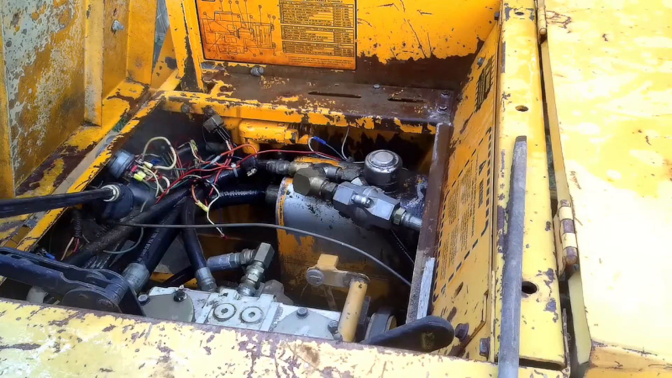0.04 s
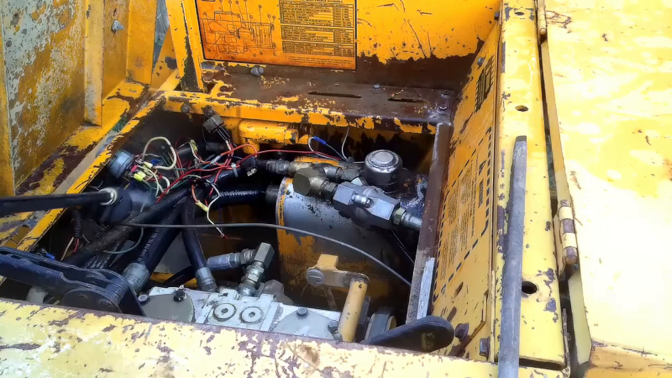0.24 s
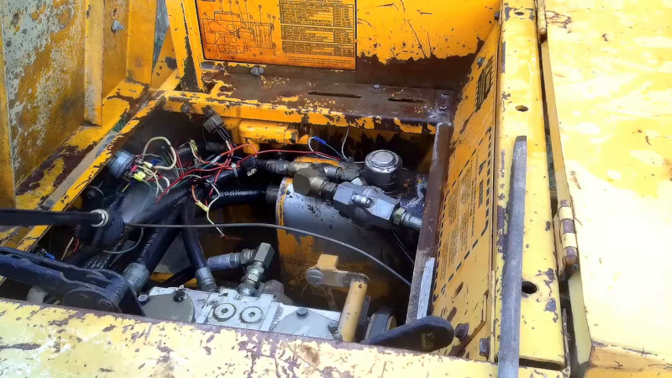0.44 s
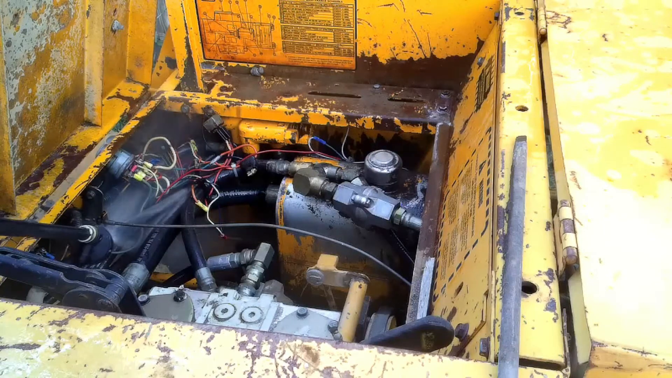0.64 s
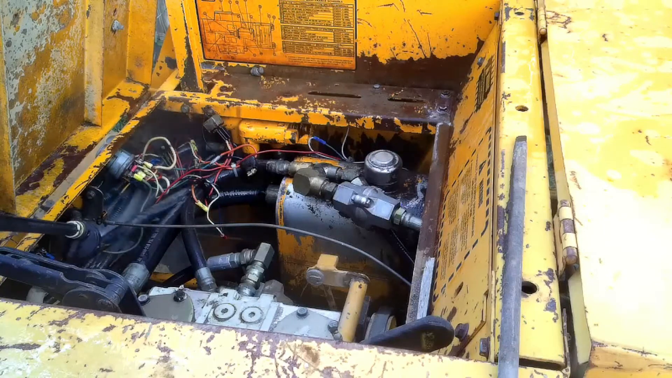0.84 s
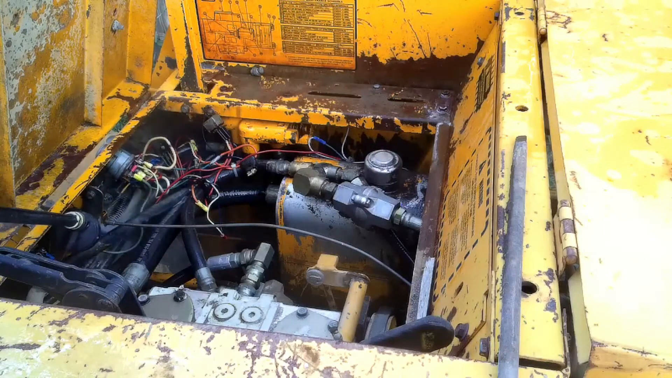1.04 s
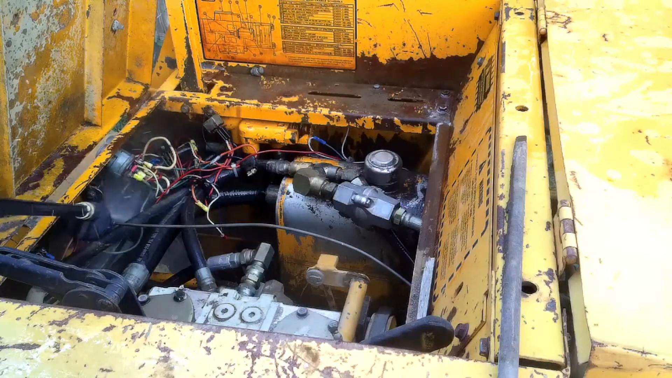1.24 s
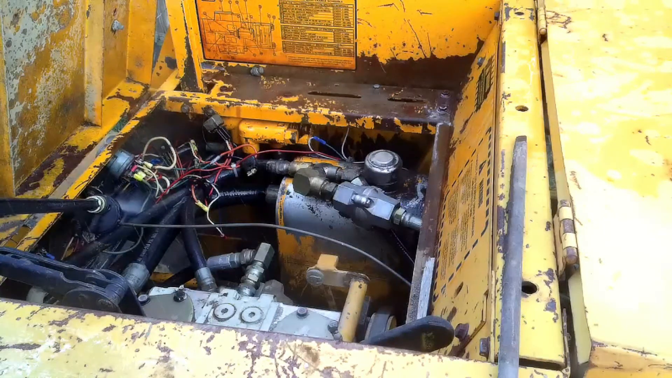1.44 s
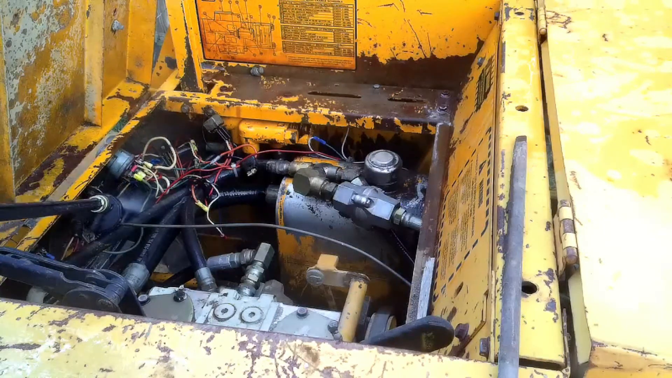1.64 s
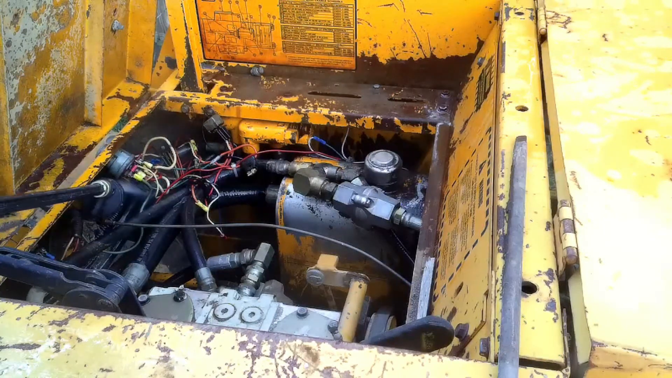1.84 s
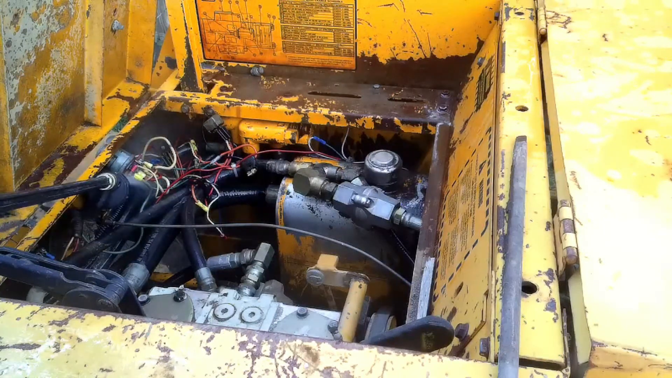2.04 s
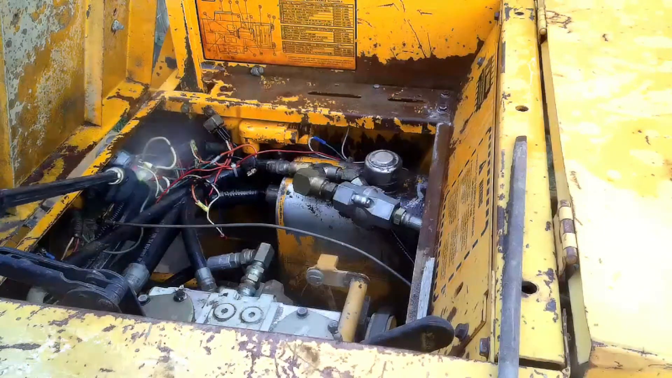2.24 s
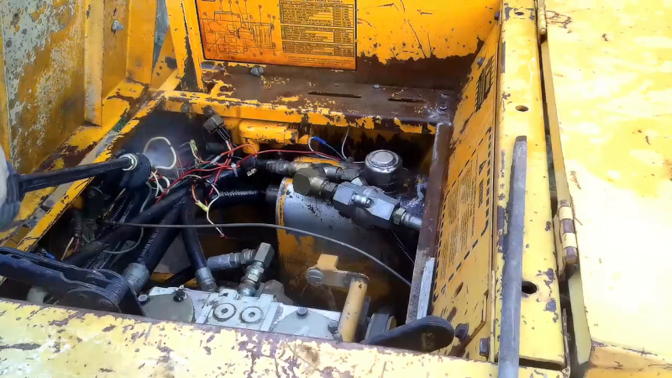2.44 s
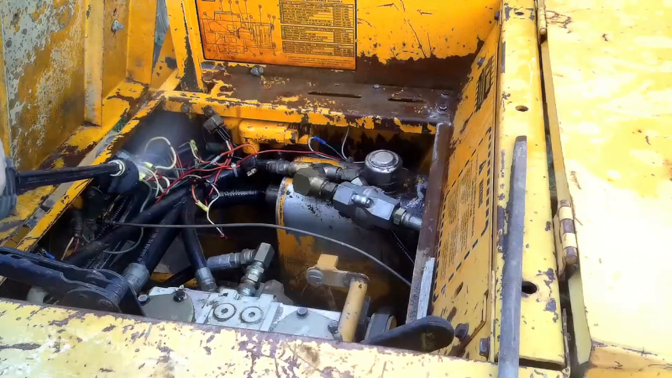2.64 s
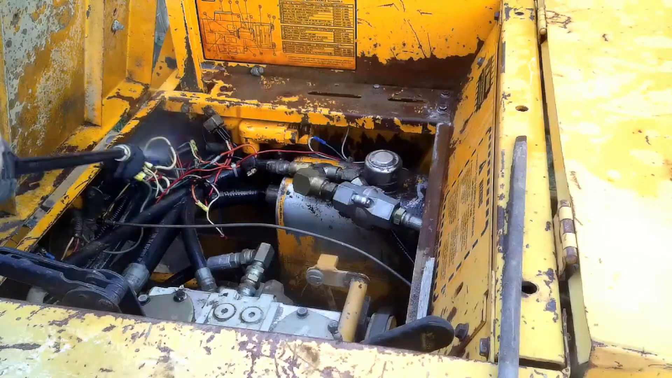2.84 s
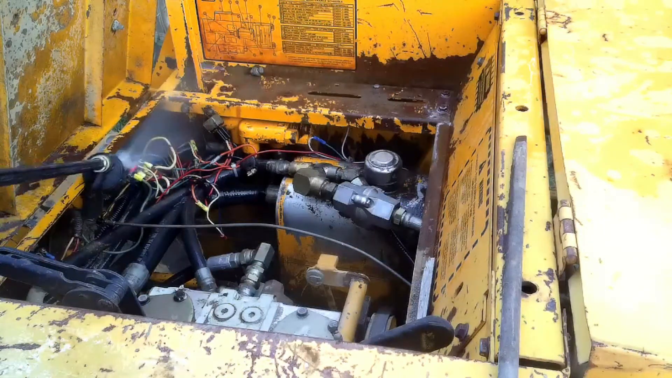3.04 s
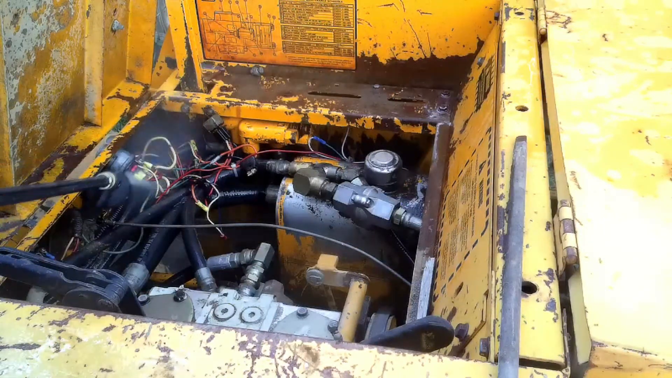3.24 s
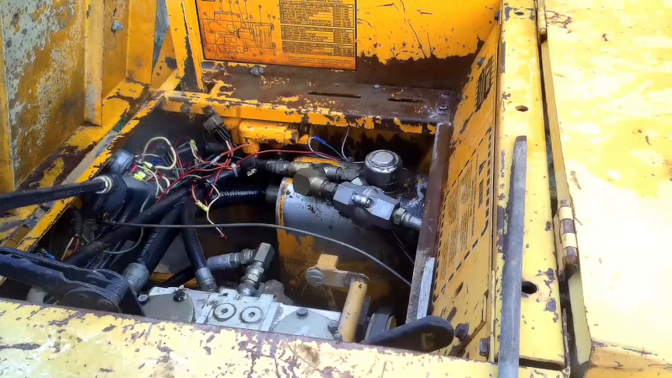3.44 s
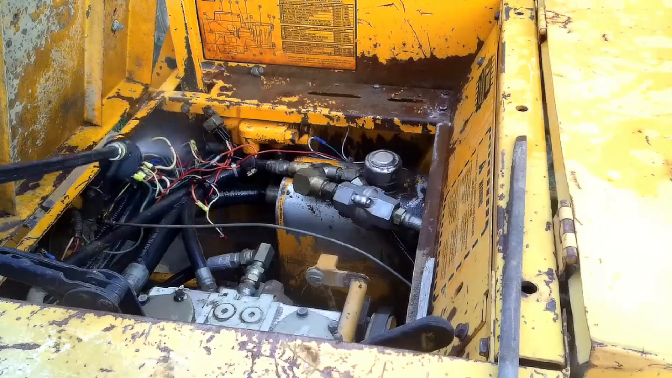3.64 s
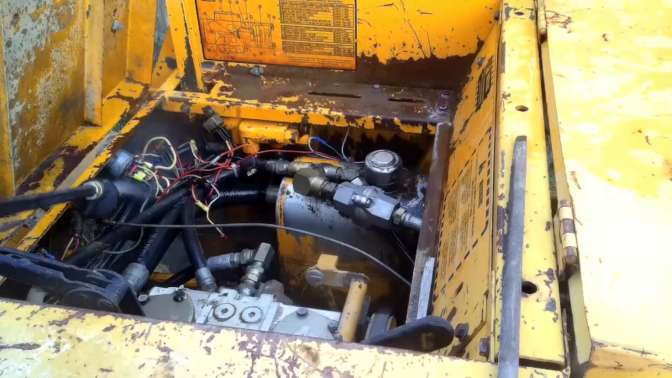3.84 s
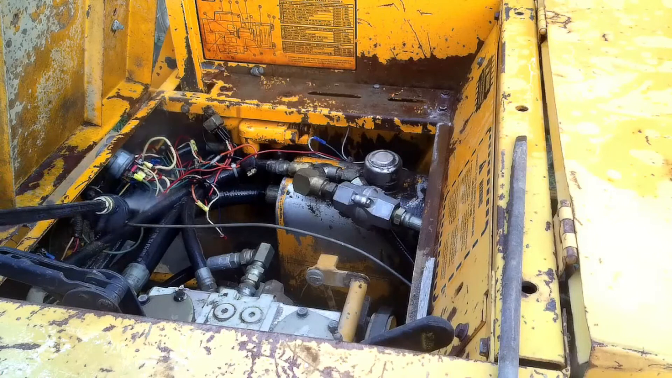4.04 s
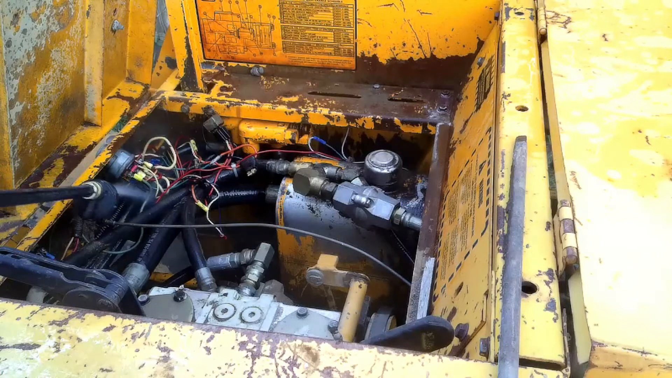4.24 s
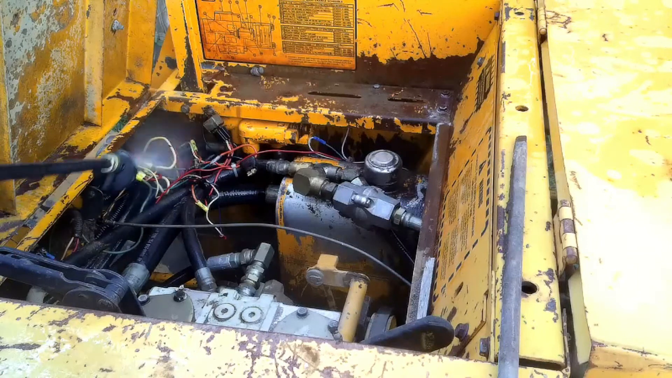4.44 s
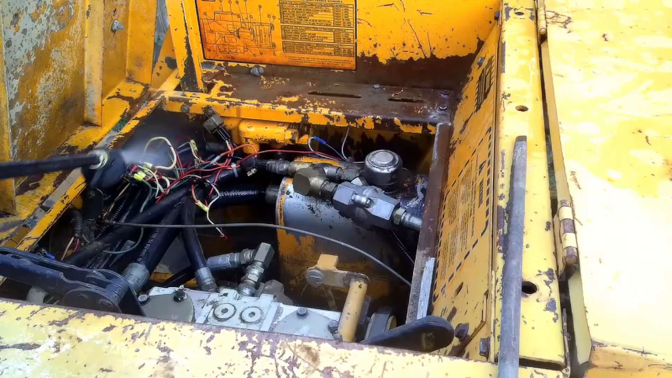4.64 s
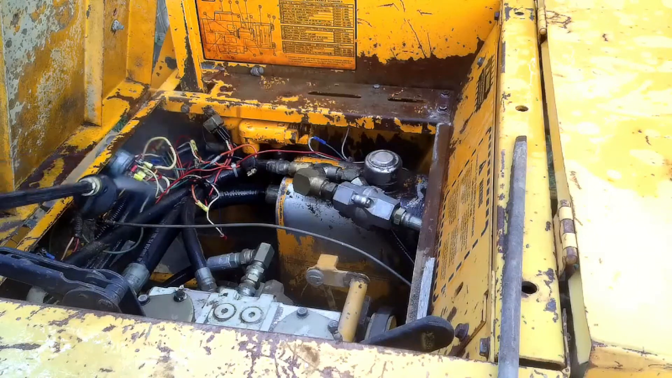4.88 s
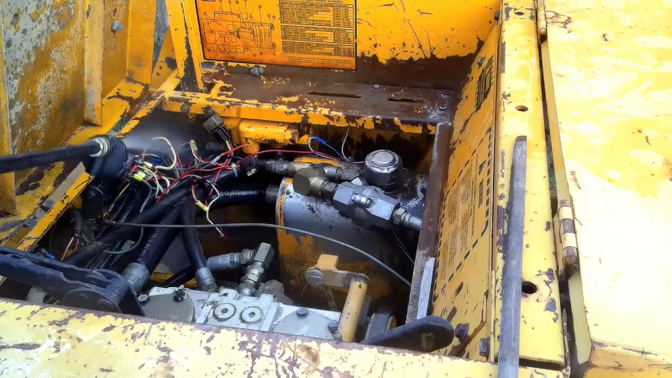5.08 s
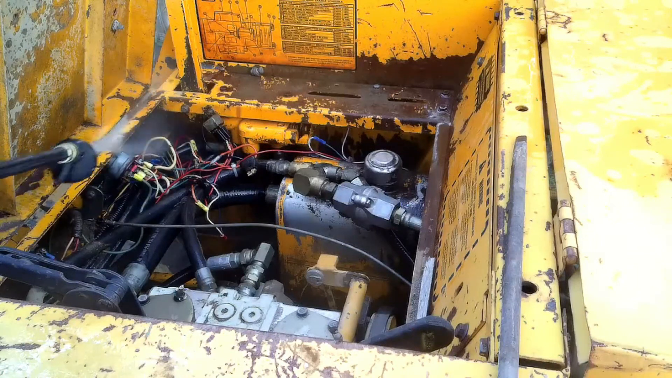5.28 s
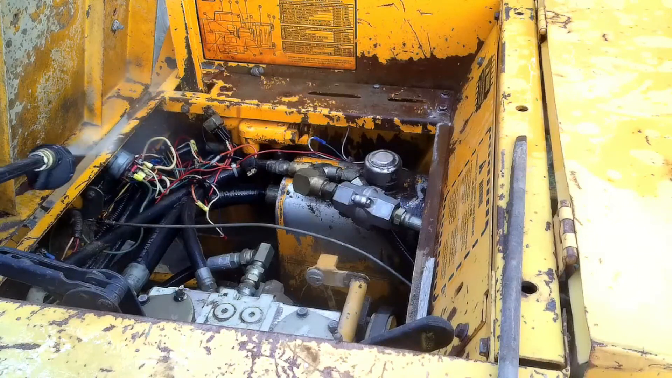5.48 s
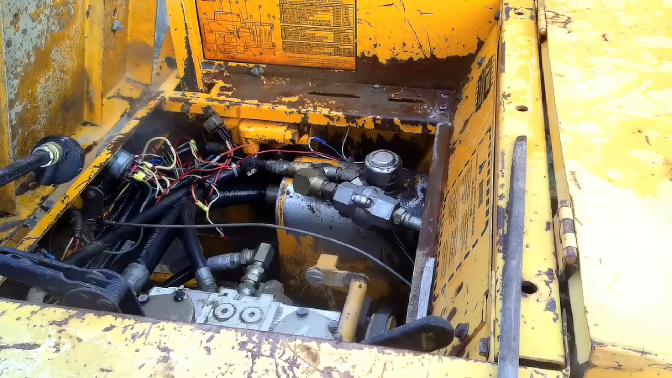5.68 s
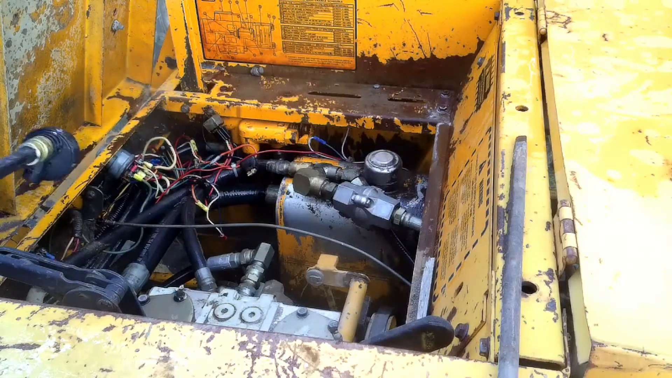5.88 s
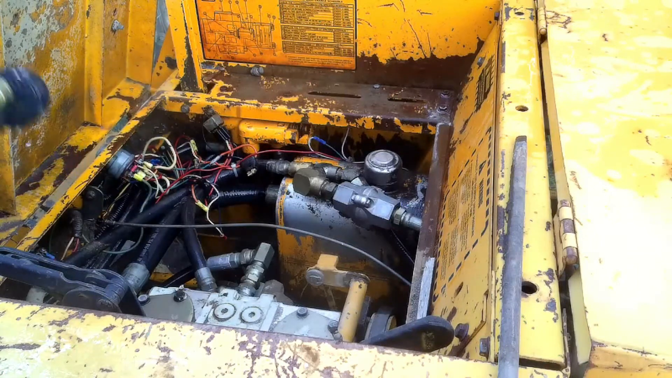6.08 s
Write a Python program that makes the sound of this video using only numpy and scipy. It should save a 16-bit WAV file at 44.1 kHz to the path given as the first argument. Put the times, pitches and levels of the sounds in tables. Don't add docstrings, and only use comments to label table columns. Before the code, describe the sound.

Steady pressurised mist hiss with a shrill electric gear whine, ending in a trigger click, a brief falling buzz, a few ticks and near silence.

```python
import sys
import numpy as np
from scipy import signal
from scipy.fft import rfft, irfft
from scipy.io import wavfile
from scipy.ndimage import uniform_filter1d

SR = 44100
rng = np.random.default_rng(int(sys.argv[2]) if len(sys.argv) > 2 else 0)


def boost(x):
    u = np.asarray(x, float) / 20
    return 10 ** u


def master(y):
    cut = np.clip(np.atleast_2d(y).T, -1, 1)
    pcm = np.round(cut * 32767)
    wavfile.write(sys.argv[1], SR, pcm.astype(np.int16))


N = 269615
TIME = np.arange(N) / SR
BINS_HZ = np.fft.rfftfreq(N, 1 / SR)
EASE_S, OFF_S, STALL_S, STILL_S = 5.55, 5.639, 5.79, 5.84


def curves(table):
    s, *columns = np.transpose(table)
    return [np.interp(TIME, s, column) for column in columns]


def on_spectrum(table, hz):
    at, db = np.transpose(table)
    return np.interp(np.log(hz + 1), np.log(at), db)


def between(tracks, centres_hz, hz):
    place = np.interp(hz, centres_hz, np.arange(len(tracks)))
    k = min(int(place), len(tracks) - 2)
    return tracks[k] + (place - k) * (tracks[k + 1] - tracks[k])


def walk(rate):
    return np.interp(TIME * rate, np.arange(400), rng.standard_normal(400))


def ring(x, hz, width):
    return signal.lfilter(*signal.iirpeak(hz, hz / width, fs=SR), x)


def wave(turns):
    return np.sqrt(2) * np.sin(2 * np.pi * (turns + rng.random()))


# frequency in Hz, density in dB per Hz.
YARD_COLOUR = [(24, -44.5), (40, -16), (86, -7), (128, -3.5), (177, -18), (412, -23), (541, -17.5),
               (597, -19), (15000, -40)]


def yard():
    rumble = irfft(rfft(rng.standard_normal(N)) * boost(on_spectrum(YARD_COLOUR, BINS_HZ)), N)
    return rumble * boost(-84 + 1.5 * walk(8.4)) / rumble.std()


# centre in seconds, level in dB, half length in seconds.
MIC_PUFFS = [
    (1.9, 3.5, .15),
    (2.49, 4.5, 0.1),
    (3.0, 3, .06),
    (4.108, -2.5, .1),
    (4.583, 5, .1),
    (5.1, 6, .05),
    (5.425, 10, 0.28),
]


def puffs():
    calm_db = -2
    return calm_db + sum(db * np.exp(-((TIME - s) / half) ** 4) for s, db, half in MIC_PUFFS)


# start in seconds, peak in dB, ring in Hz, ring time in seconds, crack in dB.
CLICKS = [
    (5.6062, -36, 3400, 0.02, 0),
    (5.776, -70, 2900, .02, -2),
    (5.802, -54, 1850, 0.019, -8),
    (5.815, -51, 1730, 0.011, 0.5),
    (5.8190, -77, 6000, .04, 8),
    (5.8284, -58, 1620, .012, -10),
    (5.9, -80, 3200, .03, -2.5),
    (6.004, -76, 350, .02, -8),
    (6.095, -87, 5500, .03, -6.5),
]


def ticks():
    out = np.zeros(N + SR)
    after = np.arange(2000) / SR
    for s, db, hz, t60, crack_db in CLICKS:
        crack_hz = max(1.1 * hz, 3000)
        fade = np.exp(-np.log(1000) * after / max(t60, .002))
        crack = ring(rng.standard_normal(len(after)), crack_hz, crack_hz)
        crack = ring(crack, crack_hz, crack_hz)
        tick = np.sin(2 * np.pi * hz * after) + boost(crack_db + 5) * crack
        start = int(s * SR)
        out[start:start + len(after)] += boost(db) * fade * tick
    return out[:N]


# time in seconds, pitch of the rotor whine in Hz, its level in dB.
COAST_DOWN = [(5.556, 3300, -75), (5.582, 2510, -42), (5.622, 1825, -44.5), (5.656, 1398, -46.5),
              (5.72, 875, -50.5), (5.76, 631, -53.5), (5.79, 525, -68), (5.825, 330, -76), (5.84, 200, -95)]
WHINE_OVERTONES = [-1, -2, -7, -5.5, -6, -8.5, -15.5, -22]
# centre in Hz, width in Hz, level in dB.
CASING_RINGS = [(610, 260, -14), (1140, 300, -9), (1570, 200, -2.5), (1780, 200, 1.5), (2410, 220, -2),
                (2830, 130, 8), (3490, 200, -4), (4080, 200, -9)]


def whine_glide():
    s, glide_hz, glide_db = np.transpose(COAST_DOWN)
    rate_hz = np.exp(np.interp(TIME, s, np.log(glide_hz)))
    turns = np.cumsum(rate_hz) / SR
    buzz = 0
    for overtone, db in enumerate(WHINE_OVERTONES, 1):
        buzz = buzz + boost(db + 2.2 * walk(60.)) * wave(overtone * (turns + 0.08 * walk(60.)))
    buzz = buzz * boost(np.interp(TIME, s, glide_db, right=-120))
    flares = sum(boost(db) * ring(ring(buzz, hz, width), hz, width) for hz, width, db in CASING_RINGS)
    return flares + boost(-17) * buzz


# time in seconds, rotor speed in turns per second.
ROTOR_TURNS = [(0, 243.6), (.9, 243.4), (1.4, 243.45), (1.75, 243.75), (2, 243.5), (2.95, 243.45),
               (3.1, 243.1), (3.85, 243.35), (4.1, 243.1), (4.85, 243.25), (4.95, 243.7), (5.1, 243.1),
               (5.6, 242.9)]


def shafts():
    sun_teeth, ring_teeth = 11, 57
    rotor = np.cumsum(curves(ROTOR_TURNS)[0]) / SR
    return rotor, rotor * sun_teeth / (sun_teeth + ring_teeth)


# time in seconds, hiss in dB,
# turned away (share 0-1), gearbox rolled up (share 0-1), rotor whine over the hiss in dB.
HAND_SWING = [(0, -47, 0.36, .5, 3), (.3, -46.5, 0, 0.4, 0.5), (.5, -46, -.1, -.1, -2.5),
              (1.3, -46.5, 0, 0.06, -3), (1.5, -47, -.1, 0.6, 1.5), (2.16, -46, 0.06, 0.52, -0.5),
              (2.58, -46.5, .3, 0.3, 5), (3.0, -47, -.1, .55, 2.5), (3.2, -46.5, .2, .5, -3.5),
              (3.7, -47.5, 0, 1, -6), (4.2, -46.5, 0.4, .7, -3.5), (4.35, -46.5, 0.6, 0.5, -16),
              (4.46, -47.5, 0.4, 0.5, -8.5), (4.85, -47.5, 0.4, 1, -12), (5.2, -47.5, .9, .8, -6.5),
              (5.38, -47.5, 1, 0.53, -13), (5.55, -48, 1, .8, -4)]
# level at rest in dB, change when turned away in dB,
# change when rolled up in dB, share of the whine's swing (0-1).
CASING_PARTS = [
    (0, -2.5, -0.5, 0),
    (0, 0, 10, 0),
    (-2, -8, 1, 0.47),
    (-0.5, 1.5, 0, 0.91),
    (0.5, -6.5, 0, 0.12),
    (-3, 4.5, 2, 0),
]


def swing():
    jet_db, away, roll, whine_db = (c - np.mean(c[:5 * SR]) for c in curves(HAND_SWING))
    parts_db = []
    for rest_db, away_db, roll_db, share in CASING_PARTS:
        parts_db.append(jet_db + rest_db + away_db * away + roll_db * roll + share * whine_db)
    parts_db[0] = parts_db[0] - 12 * np.maximum(TIME - 5.1, 0)
    return jet_db, parts_db


# frequency in Hz, density in dB per Hz.
JET_COLOUR = [(30, -110), (100, -105), (450, -89.5), (900, -85), (1280, -78.5), (1700, -83.5), (2500, -80),
              (4300, -79.5), (4800, -83), (6000, -81.5), (7750, -93), (8800, -87), (11400, -96),
              (12500, -98.5), (15300, -101.5)]
# centre
# in Hz, width in Hz, lift in dB.
HISS_HUMPS = [
    (780, 90, 3),
    (1990, 120, 2.5),
    (2520, 250, 2.5),
    (2980, 100, 1.5),
    (3550, 350, 2.5),
    (11350, 250, 2),
    (15680, 250, 3.5),
]


def hiss_colour(hz):
    humps = sum(db * np.exp(-(2 * (hz - at) / width) ** 2) for at, width, db in HISS_HUMPS)
    return on_spectrum(JET_COLOUR, hz) + humps


def wear(carrier):
    order = np.arange(1, 300)
    size = boost(hiss_colour(order * 36.0) + 6.0 + 4.5 * rng.standard_normal(len(order)))
    comb = size * np.exp(2j * np.pi * rng.random(len(order)))
    turn = irfft(np.r_[0, comb], 8192) * 8192 / np.sqrt(2)
    return np.interp(carrier % 1 * 8192, np.arange(8193), np.r_[turn, turn[0]])


# multiple of the carrier turn, level in dB.
PUMP_SONG = [(6, -81.4), (7, -75.3), (8, -86.2), (13, -77.9), (14, -73.2), (15, -77.2), (16, -75.8),
             (17, -70.2), (19, -75.3), (20, -72.4), (22, -67.6), (23, -60.8), (24, -60.2), (25, -68.3),
             (26, -60.1), (30, -71.7), (35, -70.4), (37, -71.5), (41, -71.2), (42, -71.4), (45, -72.6)]
# multiple of the carrier turn, level in dB.
GEAR_SONG = [(53, -71.3), (54, -66.7), (56, -66.8), (57, -57.1), (58, -58.9), (60, -70.2), (110, -65.7),
             (111, -67.3), (112, -59.2), (113, -55.1), (114, -57.8), (115, -58.3), (116, -58.2),
             (117, -69.8), (118, -64.4), (168, -70.8), (169, -73.9), (170, -70.6), (172, -69.8),
             (173, -73.5), (174, -69.0), (226, -71.9), (230, -72.0), (231, -72.4), (232, -74.3),
             (289, -80.7)]
# multiple of the rotor turn, multiple of the carrier turn, level in dB.
ROTOR_SONG = [(1, 0, -82.6), (3, -17, -94.8), (6, -35, -92.1), (7, 0, -60.4), (8, 15, -61.5),
              (9, -11, -70.7), (12, -12, -54.4), (13, -13, -65.5), (13, -6, -67.0), (14, -14, -66.0),
              (14, 0, -58.9), (14, 23, -65.3), (15, -16, -67.4), (15, -15, -64.6), (15, 0, -45.9),
              (16, -16, -64.7), (16, 0, -65.9), (17, -19, -65.9), (17, -18, -57.8), (17, -17, -62.0),
              (17, -16, -60.1), (18, 0, -62.9), (21, -22, -59.4), (21, 0, -63.8), (23, -24, -66.4),
              (23, -22, -64.4), (23, -21, -70.4), (24, -23, -68.9), (24, 34, -70.6), (35, -32, -70.9)]
PARTS_HZ = [1000, 2350, 3450, 3650, 4500, 5500]


def lines(rotor, carrier, parts_db):
    rows = [(0, *row) for row in list(PUMP_SONG) + list(GEAR_SONG)] + list(ROTOR_SONG)
    out = 0
    for of_rotor, of_carrier, db in rows:
        turns = of_rotor * rotor + of_carrier * carrier
        hz = turns[SR] - turns[0]
        waver_db = np.clip(0.3 * (-48 - db), .7, 3) * walk(2.5)
        gone_s = 5.57 if hz < 3000 else 5.618
        powered = np.clip((gone_s - TIME) / 0.023, 0, 1)
        level = boost(db + between(parts_db, PARTS_HZ, hz) + waver_db)
        out = out + powered * level * wave(turns + 0.03 * walk(20.))
    return out


# surge as it eases in dB, cut at switch-off in dB, fade in dB/s,
# drop at the stall in dB, dying away in dB/s.
RUSH_RELEASE = [
    (2, 11, 28, -1, 40),
    (-1, 5.5, 69.5, 7, 110),
    (4.5, 5.5, 61, 21, 85),
    (-0.5, 7, 97, 14, 75),
]


def releases():
    def step(s, lasts):
        return np.clip((TIME - s) / lasts, 0, 1)

    coasting_s = np.clip(TIME - OFF_S, 0, STILL_S - OFF_S)
    still_s = np.maximum(TIME - STILL_S, 0)
    levels = []
    for surge_db, cut_db, fade_db_s, stall_db, dying_db_s in RUSH_RELEASE:
        steps = surge_db * step(EASE_S, .02) - cut_db * step(OFF_S, 0.014)
        steps = steps - stall_db * step(STALL_S, STILL_S - STALL_S)
        levels.append(steps - fade_db_s * coasting_s - dying_db_s * still_s)
    return levels


RUSH_CENTRES_HZ = [70, 200, 800, 2500, 5000]


def hiss(carrier, bass_db, low_db, mid_db, high_db):
    noise = rfft(rng.standard_normal(N)) * boost(hiss_colour(BINS_HZ)) * np.sqrt(SR / 2)
    rush_db = [np.minimum(bass_db, 0) / 2, bass_db, low_db, mid_db, high_db]
    place = 3 * np.log2(BINS_HZ + 1)
    swell, out = walk(2.7), 0
    for band in np.arange(12, 44):
        x = irfft(noise * np.cos(np.clip(place - band, -1, 1) * np.pi / 2) ** 2, N)
        db = between(rush_db, RUSH_CENTRES_HZ, 2 ** (band / 3))
        out = out + x * boost(db + 0.44 * swell + 0.51 * walk(6.) + 1.13 * walk(25.))
    throb = sum(depth * wave(k * carrier) for k, depth in enumerate([0.034, 0.043, 0.015, 0.011], 1))
    return out * (1 + throb)


def scene():
    rotor, carrier = shafts()
    jet_db, parts_db = swing()
    bass, low, mid, high = releases()
    motor = lines(rotor, carrier, parts_db) * boost(-0.9) + wear(carrier) * boost(jet_db) * (TIME < 5.6)
    spray = hiss(carrier, puffs() + bass, 0.35 * jet_db + low, 0.99 * jet_db + mid, jet_db + high)
    mono = yard() + ticks() + whine_glide() + motor + spray
    return np.array([mono, mono])


# frequency in Hz, dip under the neighbouring bands in dB.
TREBLE_DIPS = [(3000, 6), (6000, 4.5), (8000, 3.6), (9500, 1.9), (12000, 1.9), (16000, 1.5)]


def treble_gaps(x):
    frames = dict(nperseg=2048, noverlap=1024, window="cosine")
    hz, _, cells = signal.stft(x, SR, **frames)
    bands = cells[:1024].reshape(128, 8, -1)
    band_hz = hz[4:1024:8]
    db = 10 * np.log10(np.mean(np.abs(bands) ** 2, axis=1) + 1e-20)
    db = uniform_filter1d(db, size=3, axis=1)
    strain_db = 0.6 * rng.standard_normal(db.shape[1])
    under = uniform_filter1d(db, size=15, axis=0) - db + strain_db + 0.9 * rng.standard_normal(db.shape)
    dropped = (under > on_spectrum(TREBLE_DIPS, band_hz)[:, None]) & (band_hz[:, None] > 3000)
    kept = np.where(dropped, boost(-22.5), 1)[:, None] * bands
    return signal.istft(np.vstack([kept.reshape(1024, -1), cells[1024:]]), SR, **frames)[1][:N]


# time in seconds, lowest Hz, highest Hz.
SIDE_SPECKS = [(.31, 6200, 9000), (.77, 4700, 5800), (.82, 4200, 5200), (.82, 7600, 9000),
               (.89, 4700, 5800), (1.61, 10400, 11700), (2.19, 5200, 6300), (2.44, 9700, 11000),
               (2.44, 13800, 15200), (2.63, 6300, 7600), (2.63, 14500, 15700), (2.75, 4700, 6300),
               (4.7, 4200, 5200), (6.07, 4200, 5200)]


def side_specks(x):
    side = np.zeros(N + 2048)
    window = signal.windows.kaiser_bessel_derived(2048, 4 * np.pi)
    for s, low, high in SIDE_SPECKS:
        at = 88 + 1024 * round((s * SR - 88) / 1024 - 1)
        bins = np.arange(int(low * 2048 / SR), int(high * 2048 / SR))
        size = np.sqrt(np.mean(np.abs(rfft(x[at:at + 2048], 2048)[bins]) ** 2)) / 1024
        waves = np.cos(np.pi / 1024 * np.outer(np.arange(2048) + 512.5, bins + .5))
        speck = window * (waves @ rng.standard_normal(len(bins)))
        side[at:at + 2048] += boost(-3) * size * speck
    return side[:N]


def band_limit(x):
    return signal.sosfilt(signal.butter(12, 15730, fs=SR, output="sos"), x)


def record(dry):
    mono = treble_gaps(dry[0])
    mix = mono + np.outer([1, -1], side_specks(mono))
    return band_limit(mix)


dry = scene()
out = record(dry)
master(out)
```